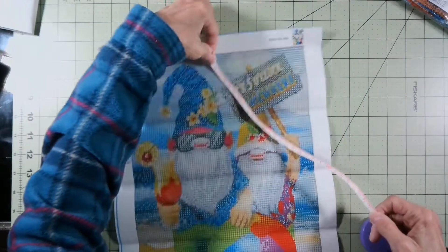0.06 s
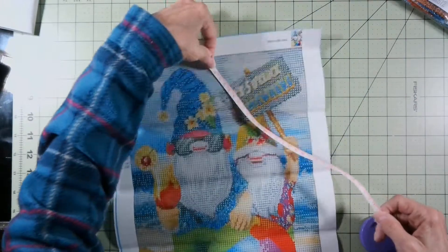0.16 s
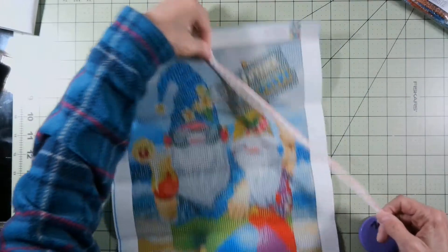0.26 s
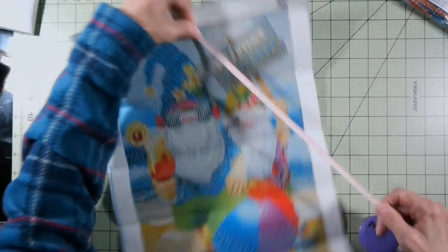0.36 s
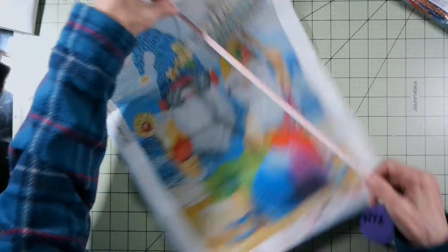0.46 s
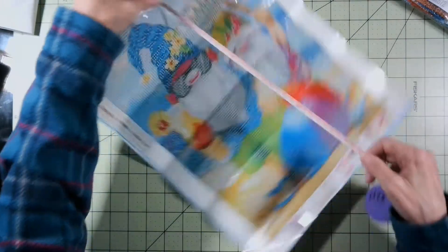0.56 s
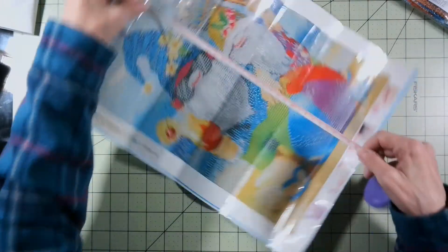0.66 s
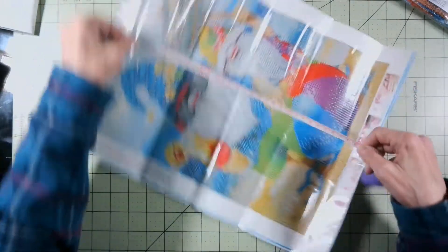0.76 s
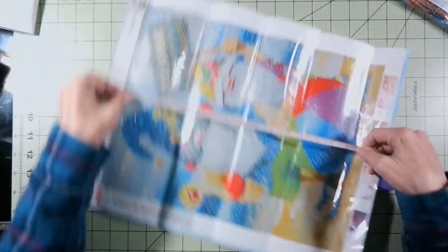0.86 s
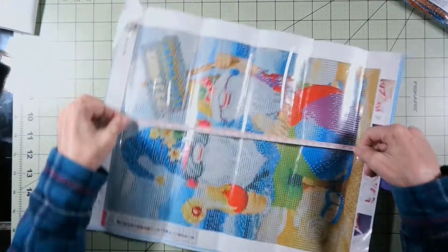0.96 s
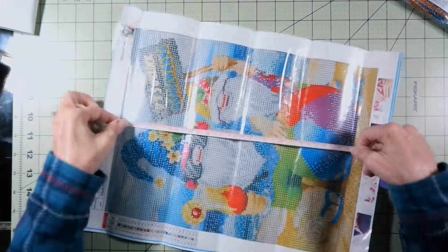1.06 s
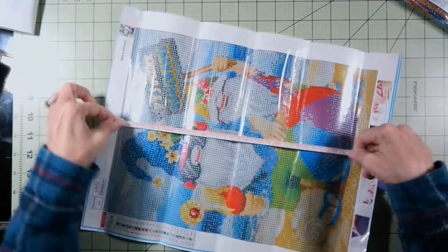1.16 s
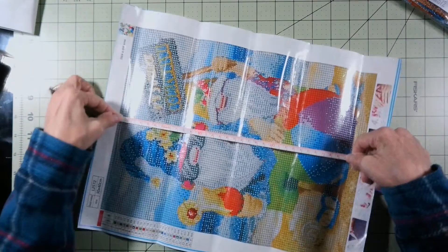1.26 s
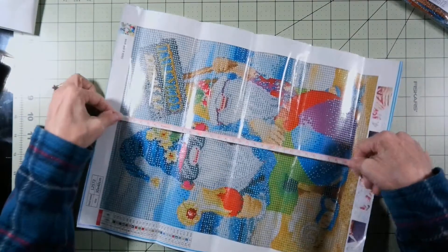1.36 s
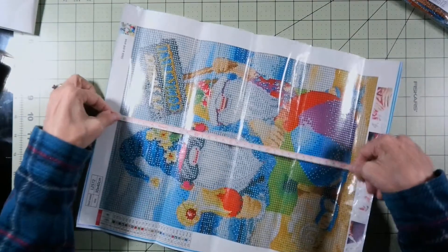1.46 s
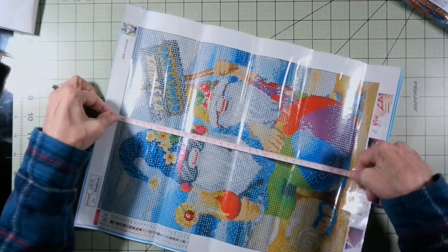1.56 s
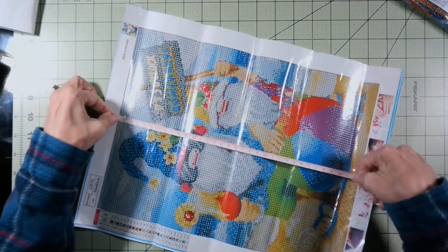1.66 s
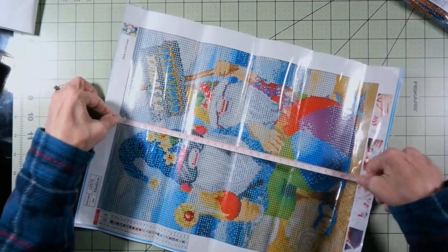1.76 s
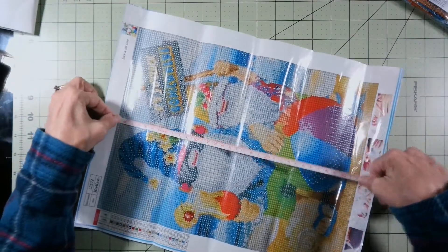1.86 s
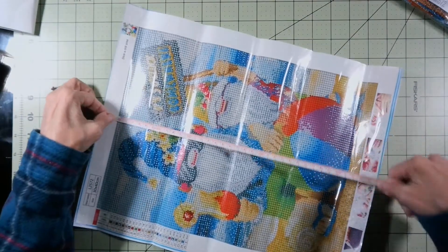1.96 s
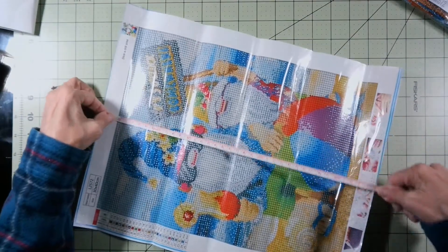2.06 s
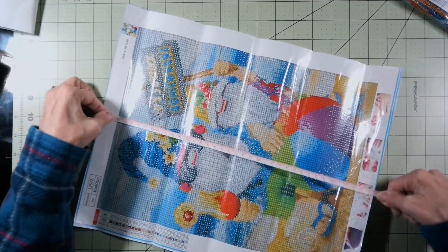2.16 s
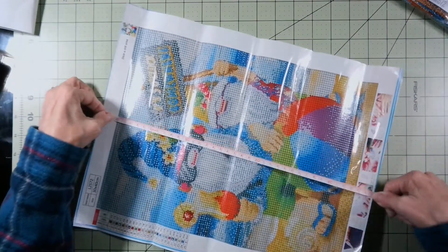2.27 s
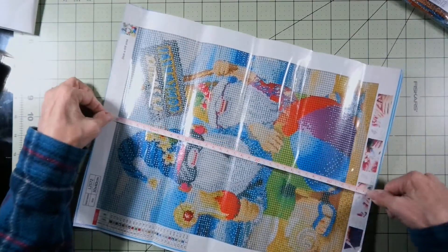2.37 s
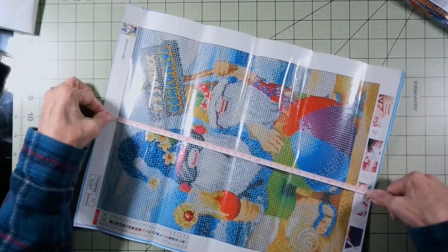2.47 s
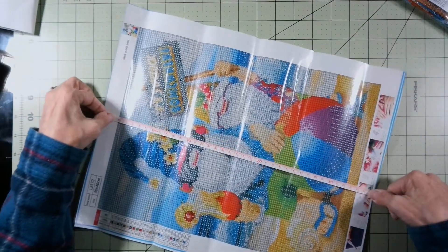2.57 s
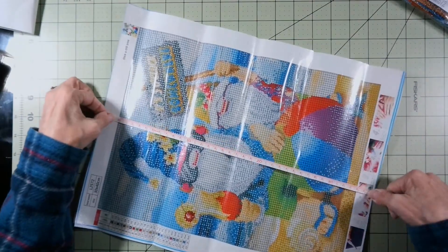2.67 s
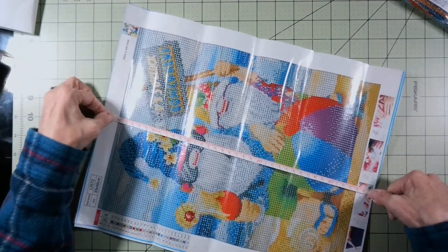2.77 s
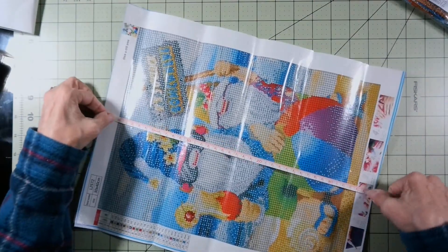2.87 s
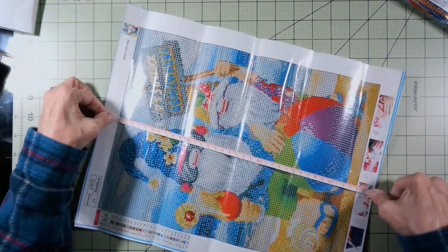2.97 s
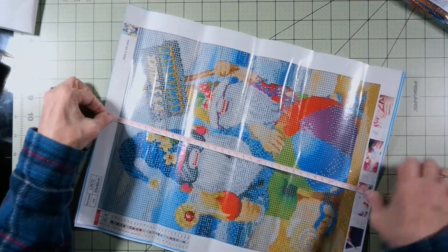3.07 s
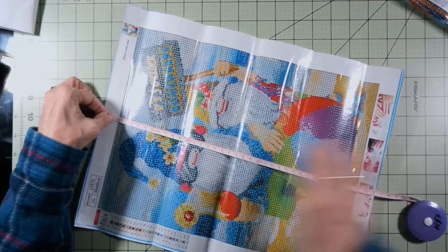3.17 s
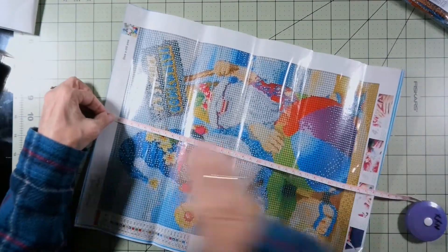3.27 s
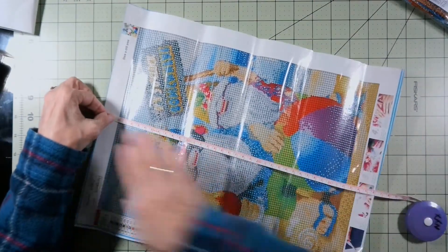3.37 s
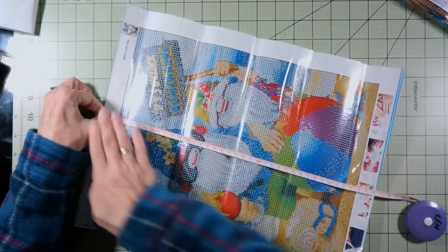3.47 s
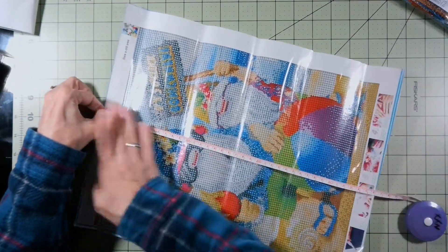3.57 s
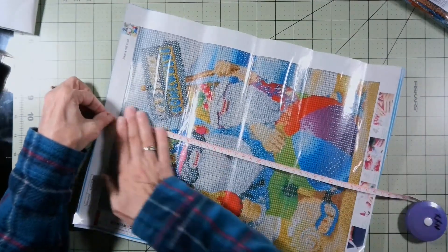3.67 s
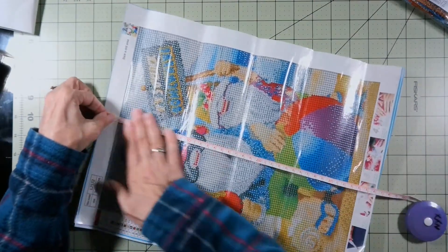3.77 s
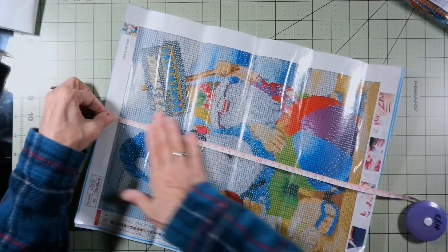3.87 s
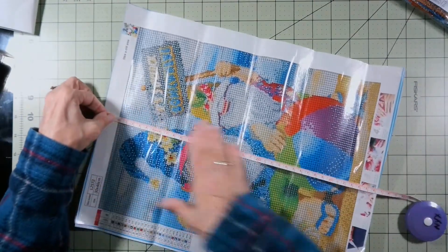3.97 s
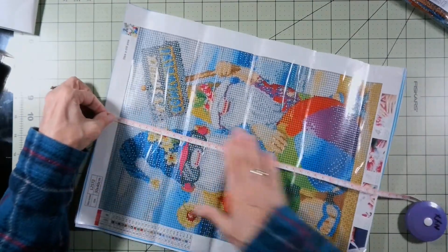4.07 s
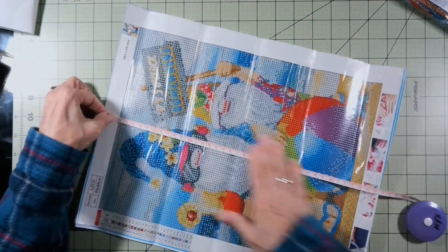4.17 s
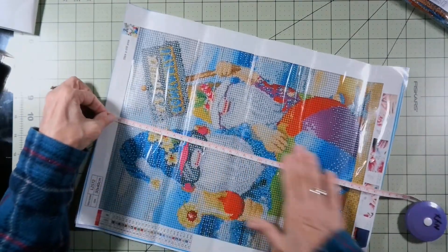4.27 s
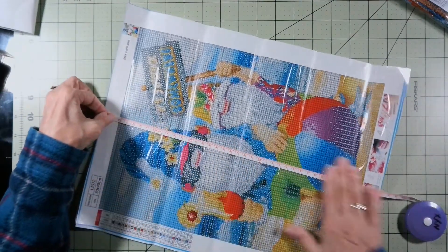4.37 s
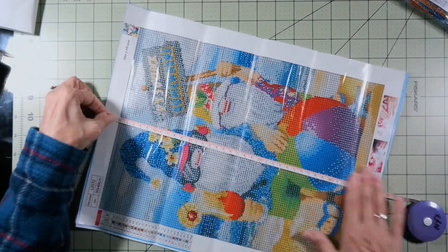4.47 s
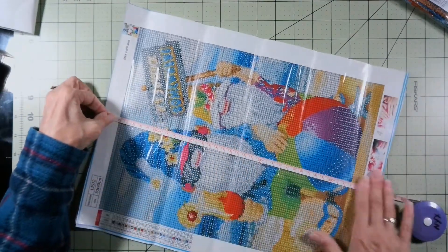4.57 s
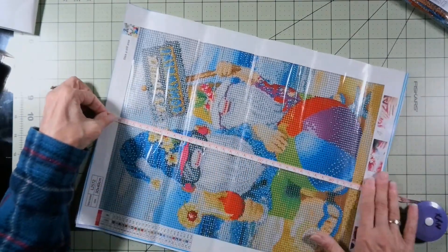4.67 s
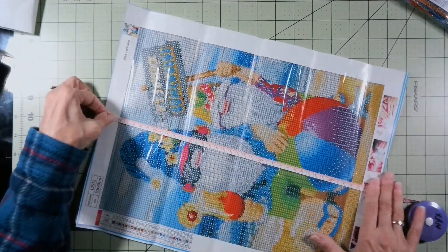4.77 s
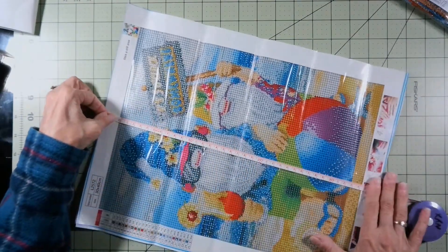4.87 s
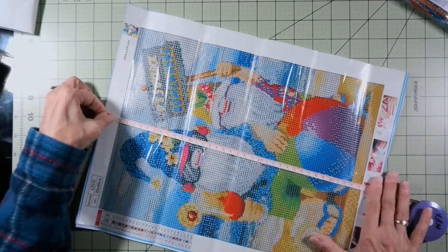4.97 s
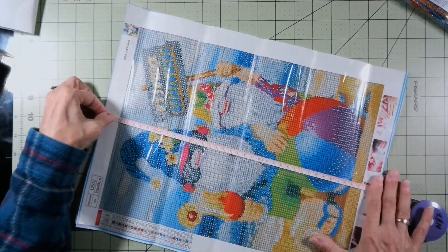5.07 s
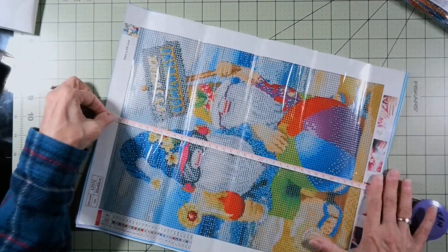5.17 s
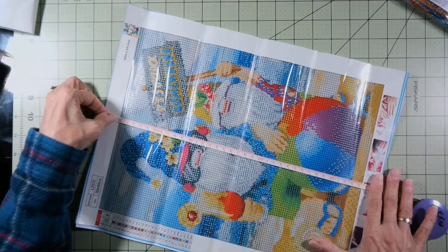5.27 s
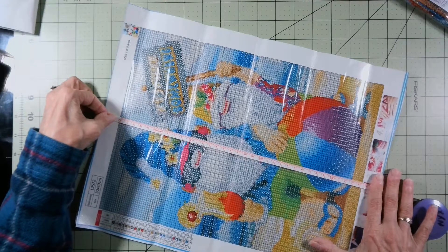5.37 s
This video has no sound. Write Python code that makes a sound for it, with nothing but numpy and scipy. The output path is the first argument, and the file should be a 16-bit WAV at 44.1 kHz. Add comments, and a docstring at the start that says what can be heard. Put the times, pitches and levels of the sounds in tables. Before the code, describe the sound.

A stiff film-covered sheet rustles and rasps over a mat, a hard case raps once loudly, then a hand pats and smooths the crackly plastic.

```python
"""Film-covered canvas on a desk

A craft canvas covered in plastic film is swung round on a cutting mat, measured with a tape, then smoothed by hand.
Friction noise and narrow noise bands give its hiss and rasp; clusters of micro-impacts give snaps and knocks.
Grain showers and noise follow the palm's pressure; the plastic tape case rings through a bank of resonances.
Two close microphones hear it in a small, dry room with faint steady air."""
import sys
import numpy as np
from scipy import signal
from scipy.fft import rfft, irfft, next_fast_len
from scipy.io import wavfile
from scipy.ndimage import uniform_filter1d

SR = 44100
rng = np.random.default_rng(int(sys.argv[2]) if len(sys.argv) > 2 else 0)


def put_to_file(sound):
    """Save the sound as 16-bit audio at rate SR, in the file named by the first command-line argument."""
    columns = np.atleast_2d(sound).T  # one column per channel
    safe = np.clip(columns, -1, 1)
    whole_steps = np.round(safe * 32767)
    wavfile.write(sys.argv[1], SR, whole_steps.astype(np.int16))


N = 239110
TIME = np.arange(N) / SR

# Levels in the tables are relative: each layer adds its own gain. Spectra give shape only.
# Steady air of the room. Each row: frequency in Hz, relative density in dB.
AIR_SPECTRUM = [(15, -46.5), (25, -3), (111, -1), (185, -9), (217, -6), (277, -7.5), (317, -8),
                (405, -10.5), (607, -11.5), (695, -11), (796, -13), (1790, -17), (2550, -18),
                (16000, -20.5)]
AIR_DB = -57
# Likeness of the two microphones in diffuse sound. Each row: frequency in Hz, correlation from -1 to 1.
MICROPHONE_LIKENESS = [(60, .64), (300, .68), (700, .72), (1400, .58), (3000, .25), (6000, .06),
                       (15000, .06)]
LEFT_LAG_S = .0001
ROOM_T60_S = 0.2
CUTOFF_HZ = 15900

# Speed of the swung canvas, as friction level. Each row: time in seconds, level in dB.
SWING = [(0.29, -39), (0.308, -45), (0.476, -30.5), (0.542, -28.5), (0.668, -42.5), (0.778, -36),
         (0.908, -37), (1.09, -56.5), (1.15, -88)]
SWING_HISS_DB = 4
# Short swells of friction: shifting canvas and tape, a pat's hissing tail, fingers resting on film.
# Each row: loudest moment in seconds, length in seconds, hiss level in dB, rasp level in dB.
FRICTION_SWELLS = [(0.012, .11, -32.5, -39), (0.171, .04, -38.5, -49), (0.256, 0.059, -33.5, -40.5),
                   (1.41, 0.64, -57.5, -69.5), (1.719, 0.058, -48.5, -57), (1.804, 0.0585, -66, -45),
                   (1.849, 0.032, -35.5, -29), (1.934, .08, -43, -62.5), (2.15, 0.77, -63.5, -70),
                   (2.29, 0.054, -57, -52), (2.885, 0.0493, -50, -54.5), (2.988, .13, -51, -57.5),
                   (3.083, 0.063, -39.5, -54), (3.47, .06, -60.5, -85), (5.149, 0.5, -66.5, -90)]
# Sliding friction. Each row: frequency in Hz, relative density in dB.
SLIDE_SPECTRUM = [(40, -3), (130, -14.5), (320, -16), (560, -20), (780, -8.5), (1050, -19), (2300, -6),
                  (3300, -4.5), (4400, -3), (5900, 1.5), (8000, -5.5), (10500, -8.5), (14700, -1),
                  (16000, -8.5)]
GRIT_PER_S, GRIT_SPREAD_DB = 700, 5
# The weave catching on the mat during the swing.
# Each row: time in seconds, level above the friction in dB, pitch in Hz, bandwidth in Hz.
SWING_RASP = [(.3, -3, 1807, 595.6), (.35, 0.5, 1842, 199.1), (.48, -7, 2000, 450), (.55, -8, 1420, 550.3),
              (.72, -8, 1378, 400), (.85, -0.5, 1553, 1007), (1, -12.5, 1506, 1008)]
# a stronger swell rasps higher: pitch at the usual level, and its climb
RASP_HZ, RASP_USUAL_DB, RASP_HZ_PER_DB = 1545, -40, 20.5
RASP_WIDTH_HZ = 400

# The loudest creases snapping. Each row: time in seconds, body level in dB, sizzle above the body in dB.
SNAPS = [(.0054, -44, 11), (.125, -41.5, 2.5), (.1515, -41.5, 8), (.3737, -30.5, 6.5), (.7388, -35, 6.5),
         (.785, -32.5, -3), (.984, -38.5, 4), (1.032, -41, 7), (1.041, -48.5, 19), (1.0735, -44.5, 19),
         (1.0904, -47, 16), (1.478, -46.5, -9), (1.682, -37.5, 1), (1.7195, -39.5, 2), (1.7588, -43, 6),
         (1.9177, -41, 15), (1.9569, -41, 12.5), (2.0287, -47, 7), (2.2428, -50.5, 14.5),
         (3.0249, -28.5, 4.5), (3.712, -38.5, 6), (3.7441, -32.5, 3), (3.814, -34, -2), (3.958, -32.5, -4),
         (4.097, -33, -6), (4.1304, -41, 13), (4.286, -47, 25.5), (4.3799, -41.5, 8), (4.966, -49.5, 5),
         (5.3163, -49.5, 17.5), (5.3365, -41.5, -2)]
# Film flexed so that faint creases give at random. Each row: start in seconds, end in seconds, mean level in dB.
FLEXES = [(0.299, .95, -41.5), (0.949, 1.109, -55), (1.297, 1.504, -59), (1.675, 2.021, -59),
          (4.454, 4.697, -60), (4.948, 5.358, -58.5)]
TICKS_PER_S, TICK_SPREAD_DB, TICK_SIZZLE_DB = 20, 3.5, 6.5
# Body of a snap. Each row: frequency in Hz, relative density in dB.
SNAP_BODY_SPECTRUM = [(200, -0.5), (900, -16), (1800, -13.5), (3500, -14.5), (6300, 3), (8500, -2.5),
                      (11000, -2.5), (16000, -26)]
# Sizzling top of a snap. Each row: frequency in Hz, relative density in dB.
SNAP_TOP_SPECTRUM = [(1000, -42.5), (9000, -28), (12000, -14), (14800, -1.5), (16000, -8)]
SNAP_LOW_HZ = 500   # thin film radiates little bass

# Fingers and canvas landing on the desk.
# Each row: time in seconds, knock level in dB, thud against the knock in dB, desk boom against the knock in dB.
PATS = [(1.011, -43, -0.5, -11), (1.228, -29.5, -12.5, -30), (1.715, -31.5, -24, -30),
        (2.261, -26.5, -24.5, -32), (3.445, -62, -5, 9), (3.614, -25.5, -23, -18),
        (3.626, -19.5, -22, -19.5), (3.963, -27, -30, -24), (4.183, -37.5, -23, -25), (4.49, -44, -28, -27),
        (4.922, -46, -32, -37)]
# Knock of a pat. Each row: frequency in Hz, relative density in dB.
PAT_KNOCK_SPECTRUM = [(80, 4), (300, -15.5), (550, -13), (800, 1), (1100, -3.5), (1500, 8), (2200, 0.5),
                      (3200, -5), (9000, -30.5)]
# Thud of a pat. Each row: frequency in Hz, relative density in dB.
PAT_THUD_SPECTRUM = [(40, -9.5), (150, -5.5), (290, 1), (450, -8.5), (650, -17), (2000, -37)]
# The film's slap in a pat. Each row: frequency in Hz, relative density in dB.
PAT_SLAP_SPECTRUM = [(800, -14), (2500, -42.5), (4000, -6.5), (5800, -3.5), (9500, -23), (14500, 0),
                     (16000, -17.5)]
SLAP_DB = -7   # against the knock
DESK_MODE_HZ, DESK_MODE_WIDTH_HZ = 138, 24
# the whole desk sways after a blow
SWAY_HZ, SWAY_WIDTH_HZ, PAT_SWAY_DB, TAP_SWAY_DB = 44, 12, 52.5, 5.5

# Pressure of the palm stroking the film. Each row: time in seconds, skin level in dB, desk rumble level in dB.
PRESS = [(3.61, -60, -60.5), (3.658, -52, -71), (3.782, -45, -63), (4.172, -44, -54), (4.29, -41.5, -62),
         (4.434, -48, -62), (4.608, -58.5, -74), (4.72, -79, -80)]
SKIN_DB, CRINKLE_DB, RUMBLE_DB = 4, 0.5, 5.5   # each layer against the pressure
# Folds flattened in the film. Each row: middle in seconds, crinkle level in dB, sizzle level in dB.
FOLDS = [(1.085, -56, -35), (3.627, -29.5, -33), (3.735, -41.5, -49), (3.958, -29, -49), (4.044, -38, -49),
         (4.114, -32.5, -33), (4.305, -64, -29.5)]
FOLD_S = 0.036   # time one takes to flatten
# Facets of the film crackling by their size.
# Each row: resonance in Hz, bandwidth in Hz, level in dB, mean rate in snaps per second.
FACETS = [(1770, 1460, -17, 180), (3540, 390, -16, 280), (6220, 2400, -4.5, 330), (8950, 6400, -9, 370)]
# Fine crinkle. Each row: frequency in Hz, relative density in dB.
CRINKLE_SPECTRUM = [(150, -18), (550, -42), (1100, -22), (1800, -1.5), (3000, -6), (6300, 11), (10500, 5.5),
                    (14700, 2), (16000, -3.5)]
# Skin on film. Each row: frequency in Hz, relative density in dB.
SKIN_SPECTRUM = [(500, -28), (2000, -37), (6000, -19), (10500, -12.5), (13000, -3), (14800, 5.5),
                 (16000, -8.5)]
# Desk under the moving palm. Each row: frequency in Hz, relative density in dB.
RUMBLE_SPECTRUM = [(20, 3.5), (45, 10), (75, -11), (125, 1), (220, -15.5), (600, -24), (2000, -63)]
# the weight of the palm settles on the desk near the start of the stroke
SETTLE_S, SETTLE_LENGTH_S, SETTLE_DB = 3.645, 0.061, -39.5

# Tape and its hard plastic case knocking. Each row: time in seconds, level in dB, share of ringing in dB.
TAPS = [(1.5053, -23, -5.5), (1.607, -37.5, 0), (2.422, 4, -3.5), (2.427, -8.5, -2.5), (2.885, -36.5, -7),
        (2.945, -38, 0), (3.026, -16.5, -3.5), (3.031, -20.5, -8), (3.08, -21.5, -5), (3.093, -26.5, -2)]
# Resonances of the case. Each row: frequency in Hz, bandwidth in Hz, gain in dB.
CASE_MODES = [(818, 86, -5), (1440, 380, -4), (2275, 300, -4), (3840, 240, -9.5), (5460, 660, 5),
              (6156, 530, 7.5), (6240, 190, 4), (7640, 640, -1.5), (13500, 490, 1.5), (15100, 630, -3)]
# Crack of the case. Each row: frequency in Hz, relative density in dB.
CASE_CRACK_SPECTRUM = [(30, -11.5), (100, -17), (350, -12), (600, -14), (1000, -14), (3000, -0.5),
                       (5600, 9.5), (9800, -8), (13500, 2), (16000, 0)]
ONSET_LEAD_S, ONSET_DB = 0.0021, -26.5   # a faint onset just before each knock softens its attack
CHATTER_S = 0.052   # decay setting of a knock
TAP_THUD_DB = -3.5   # the desk's thud under the case


def from_db(db):
    """Decibels express an amplitude ratio as 20 times its logarithm."""
    return 10 ** (np.asarray(db) / 20)


def rms_one(x):
    """Dividing by the root mean square sets the mean power to one."""
    return x / np.sqrt(np.mean(x ** 2) + 1e-20)


def unit_energy(pair):
    """Dividing by the norm gives each channel unit energy."""
    return pair / np.linalg.norm(pair, axis=-1, keepdims=True)


def at_hz(points, hz):
    """A spectrum is interpolated on a logarithmic frequency axis."""
    known_hz, values = np.transpose(points)
    return np.interp(np.log(hz + 1e-3), np.log(known_hz), values)


def in_time(rows):
    """Straight lines join the control points of each column."""
    s, *columns = np.transpose(rows)
    return [np.interp(TIME, s, column) for column in columns]


def during(rows):
    """A moving average softens the ends of a gate that is one while a gesture lasts."""
    inside = (TIME >= rows[0][0]) & (TIME <= rows[-1][0])
    return uniform_filter1d(1. * inside, size=600)


def swells(times, lengths_s, levels_db):
    """A level that rises and falls smoothly follows a Gaussian bell."""
    lengths_s = np.broadcast_to(lengths_s, len(times))
    return sum(from_db(db) * np.exp(-(2 * (TIME - s) / length) ** 2)
               for s, length, db in zip(times, lengths_s, levels_db))


def drift(rate):
    """Random knots, rate per second, joined by lines make a slow fluctuation of rms 1."""
    knots = rng.standard_normal(8192)
    return rms_one(np.interp(TIME * rate, np.arange(len(knots)), knots))


def convolve(x, response):
    """A linear system's output is its input convolved with its impulse response."""
    return signal.fftconvolve(np.atleast_2d(x), np.atleast_2d(response), axes=1)[:, :N]


def colour(x, spectrum, size=4096):
    """A causal minimum-phase filter, from the folded cepstrum, keeps the power of white noise."""
    level_db = at_hz(spectrum, np.fft.rfftfreq(size, 1 / SR))
    cepstrum = irfft(np.log(from_db(level_db)))
    cepstrum[1:size // 2] *= 2
    cepstrum[size // 2 + 1:] = 0
    response = irfft(np.exp(rfft(cepstrum)))
    return convolve(x, response / np.linalg.norm(response))


def resonance(x, hz, width_hz):
    """A two-pole resonator has a gain near 1 at its peak and a bandwidth set by its pole radius."""
    r = np.exp(-np.pi * width_hz / SR)
    zeros = np.array([1, 0, -1]) * (1 - r * r) / 2
    poles = [1, -2 * r * np.cos(2 * np.pi * hz / SR), r * r]
    return signal.lfilter(zeros, poles, x)


def spread(pair):
    """Mid and side weights give two unrelated signals a coherence high in the bass, low in the treble."""
    size = next_fast_len(pair.shape[1])
    alike = np.clip(at_hz(MICROPHONE_LIKENESS, np.fft.rfftfreq(size, 1 / SR)), -.99, .99)
    mid, side = rfft(pair, size) * np.sqrt([(1 + alike) / 2, (1 - alike) / 2])
    return irfft([mid + side, mid - side], size)[:, :pair.shape[1]]


def noise():
    """White noise reaches the two microphones as a diffuse field."""
    return spread(rng.standard_normal((2, N)))


def grains(per_s, size_spread_db, t60):
    """Random snaps with exponentially distributed sizes in dB decay as noise; rms 1."""
    sizes = from_db(size_spread_db * np.minimum(rng.exponential(1, N), 4))
    born = rng.random(N) < per_s / SR
    decay_per_sample = np.exp(-np.log(1000) / (t60 * SR))
    envelope = signal.lfilter([1], [1, -decay_per_sample], sizes * born + 1e-18)
    return rms_one(envelope * noise())


def bursts(times, levels_db, t60s, size=8192):
    """A contact is a dying cluster of micro-impacts, whitened, with an energy set by its level."""
    out, age = np.zeros((2, N + size)), np.arange(size) / SR
    for s, db, t60 in zip(times, levels_db, t60s + np.zeros(len(times))):
        decay = from_db(-60 * age / t60)
        spectrum = rfft(rng.standard_normal((2, size)) * decay)
        # whitening smears the decay, so it is shortened again
        burst = irfft(spectrum / np.abs(spectrum)) * np.sqrt(decay)
        start = max(round(s * SR), 0)
        out[:, start:start + size] += from_db(db) * unit_energy(burst)
    return spread(out[:, :N])


def pushes(times, levels_db):
    """A blow much shorter than a mode's period acts as one impulse."""
    return np.bincount(np.round(times * SR).astype(int), from_db(levels_db), N)


def skipping(pitch_hz, width_hz, side_db):
    """Stick-slip of the weave is a carrier modulated by slow noise, narrower when regular; rms 1."""
    memory = .9
    # the skips lose step with one another faster when the band is wide
    clock = np.cumsum(np.pi * np.broadcast_to(width_hz, N) / (1 - memory)) / SR
    complex_noise = rng.standard_normal((2, N)) + 1j * rng.standard_normal((2, N))
    skips = signal.lfilter([1], [1, -memory], complex_noise)
    mid, side = (np.interp(clock % N, np.arange(N), row) for row in skips)
    carrier = np.exp(2j * np.pi * np.cumsum(pitch_hz) / SR)
    band = np.real((mid + from_db(side_db) * side * [[1], [-1]]) * carrier)
    return rms_one(signal.sosfilt(signal.butter(4, 1180, "high", fs=SR, output="sos"), band))


def delayed(x, seconds):
    """Propagation delays a signal by path length over sound speed."""
    return np.interp(TIME - seconds, TIME, x)


def from_the_right(pair):
    """Difference in arrival time: sound from the right reaches the left microphone a little later."""
    return np.array([np.roll(pair[0], round(LEFT_LAG_S * SR)), pair[1]])


def room_air():
    """Stationary noise with a mostly falling spectrum forms the room's faint background."""
    return from_db(AIR_DB) * colour(noise(), AIR_SPECTRUM)


def sliding_canvas():
    """Sliding friction radiates fine hiss with a little grit, its level following the swing and the swells."""
    swing_db, = in_time(SWING)
    s, length_s, hiss_db, _ = np.transpose(FRICTION_SWELLS)
    swing_level = from_db(swing_db + SWING_HISS_DB) * during(SWING)
    level = swing_level + swells(s, length_s, hiss_db)
    grit = grains(per_s=GRIT_PER_S, size_spread_db=GRIT_SPREAD_DB, t60=0.0015)
    friction = noise() + from_db(-6.5) * grit
    flutter_db = 0.76 * drift(70)
    return level * from_db(flutter_db) * colour(friction, SLIDE_SPECTRUM)


def rasping_weave():
    """Stick-slip rasp rides on the swing's speed; in a short swell its pitch climbs with the level."""
    swing_db, = in_time(SWING)
    grip_db, pitch_hz, width_hz = in_time(SWING_RASP)
    swing_level = from_db(swing_db + grip_db) * during(SWING_RASP)
    swung = swing_level * skipping(pitch_hz, width_hz, side_db=-7.5)
    s, length_s, _, rasp_db = np.transpose(FRICTION_SWELLS)
    swell = swells(s, length_s, rasp_db)
    swell_db = 20 * np.log10(np.maximum(swell, .002))
    swell_hz = RASP_HZ + RASP_HZ_PER_DB * (swell_db - RASP_USUAL_DB)
    return swung + swell * skipping(swell_hz, RASP_WIDTH_HZ, side_db=-2)


def faint_ticks():
    """Creases give at random, one in each time slot of a flex; rows are laid out as in SNAPS."""
    rows = []
    for start, end, db in FLEXES:
        for slot in np.arange(start, end, 1 / TICKS_PER_S):
            s = rng.uniform(slot, min(slot + 1 / TICKS_PER_S, end))
            rows.append((s, db + TICK_SPREAD_DB * rng.standard_normal(), TICK_SIZZLE_DB))
    return rows


def film_snaps():
    """Snap-through buckling: a crease flips suddenly, a thin tick with a shorter sizzling top."""
    s, level_db, sizzle_db = np.vstack([SNAPS, faint_ticks()]).T
    body_burst = bursts(s + 0.00071, level_db, t60s=0.015)
    top_burst = bursts(s + 0.00061, level_db + sizzle_db, t60s=0.0046)
    body = from_db(26.5) * colour(body_burst, SNAP_BODY_SPECTRUM)
    top = from_db(28.5) * colour(top_burst, SNAP_TOP_SPECTRUM)
    return signal.sosfilt(signal.butter(2, SNAP_LOW_HZ, "high", fs=SR, output="sos"), body + top)


def pats():
    """A soft impact excites several bodies: canvas knocks and thuds, desk booms and sways, film slaps."""
    s, knock_db, thud_db, boom_db = np.transpose(PATS)
    knock = from_db(16.5) * colour(bursts(s, knock_db, t60s=0.0456), PAT_KNOCK_SPECTRUM)
    # long waves: the same at both microphones
    thud_burst = bursts(s, knock_db + thud_db, t60s=0.087)[0]
    thud = from_db(23) * colour(thud_burst, PAT_THUD_SPECTRUM)
    boom = from_db(52.0) * resonance(pushes(s, knock_db + boom_db), DESK_MODE_HZ, DESK_MODE_WIDTH_HZ)
    sway = resonance(pushes(s, knock_db + thud_db + PAT_SWAY_DB), SWAY_HZ, SWAY_WIDTH_HZ)
    slap = from_db(24) * colour(bursts(s, knock_db + SLAP_DB, t60s=0.021), PAT_SLAP_SPECTRUM)
    return knock + thud + boom + sway + slap


def smoothing_palm():
    """Pressure drives friction and buckling: skin sizzles, facets and folds crackle, the desk rumbles."""
    press, weight = from_db(in_time(PRESS)) * during(PRESS)
    s, crinkle_db, sizzle_db = np.transpose(FOLDS)
    crinkle = from_db(CRINKLE_DB) * press + swells(s, FOLD_S, crinkle_db)
    sizzle = from_db(SKIN_DB) * press + swells(s, FOLD_S, sizzle_db)
    fine = from_db(-4.5) * colour(grains(per_s=1300, size_spread_db=8.0, t60=0.0066), CRINKLE_SPECTRUM)
    facets = sum(from_db(db) * rms_one(resonance(grains(per_s, size_spread_db=4, t60=0.016), hz, width))
                 for hz, width, db, per_s in FACETS)
    skin = colour(grains(per_s=2000, size_spread_db=-0.5, t60=0.0029), SKIN_SPECTRUM)
    settling = swells([SETTLE_S], SETTLE_LENGTH_S, [SETTLE_DB])
    rumble = (from_db(RUMBLE_DB) * weight + settling) * colour(noise(), RUMBLE_SPECTRUM)
    return crinkle * (fine + facets) + sizzle * skin + rumble


def tape_case():
    """Impact excites the modes of a hollow shell, with a soft onset, then chatter; the desk thuds and sways."""
    landings = np.array(TAPS)
    onsets = landings + [-ONSET_LEAD_S, ONSET_DB, 0]
    s, level_db, ring_db = np.vstack([landings, onsets]).T
    contact = bursts(s, level_db + ring_db, CHATTER_S)
    # neighbouring modes have opposite signs
    shell = sum((-1) ** k * from_db(db) * resonance(contact, hz, width)
                for k, (hz, width, db) in enumerate(CASE_MODES))
    crack = colour(bursts(s, level_db, CHATTER_S), CASE_CRACK_SPECTRUM)
    thud = resonance(pushes(s, level_db + TAP_THUD_DB), DESK_MODE_HZ, DESK_MODE_WIDTH_HZ)
    sway = resonance(pushes(s, level_db + TAP_SWAY_DB), SWAY_HZ, SWAY_WIDTH_HZ)
    return from_db(24.5) * shell + from_db(17) * crack + thud + sway


def room(x, wet_db, desk_echo_db, desk_echo_s, size=16384):
    """Reflection and reverberation: an early echo off the desk, then a diffuse tail that the walls dull."""
    age = np.arange(size) / SR
    decay = from_db(-60 * age / ROOM_T60_S) * (age > .003)
    tail = unit_energy(spread(rng.standard_normal((2, size))) * decay)
    walls = signal.butter(1, 11000 / (SR / 2))
    reverberation = signal.lfilter(*walls, convolve(x[0], tail))
    echo = np.array([delayed(side, desk_echo_s) for side in x])
    return x + from_db(desk_echo_db) * echo + from_db(wet_db) * reverberation


def scene():
    """Superposition: the handling sounds in the room add to its faint steady air."""
    air = room_air()
    on_desk = sliding_canvas() + rasping_weave() + from_the_right(pats() + tape_case())
    desk = room(on_desk, wet_db=-8.0, desk_echo_db=-18.0, desk_echo_s=0.0024)
    film = room(film_snaps() + smoothing_palm(), wet_db=-10.0, desk_echo_db=-16.5, desk_echo_s=0.005)
    return air + desk + film


def record(dry):
    """Band limits and soft saturation: deepest rumble shed, loud peaks rounded, top cut."""
    lean = signal.sosfilt(signal.butter(2, 32, "high", fs=SR, output="sos"), dry)
    rounded = 1.1 * np.tanh(lean / 1.1)
    return signal.sosfilt(signal.ellip(10, .1, 70, CUTOFF_HZ, fs=SR, output="sos"), rounded)


dry = scene()
out = record(dry)
put_to_file(out)
```